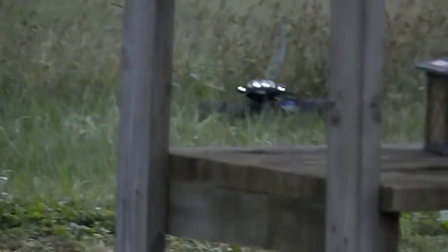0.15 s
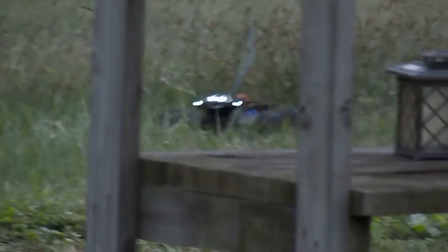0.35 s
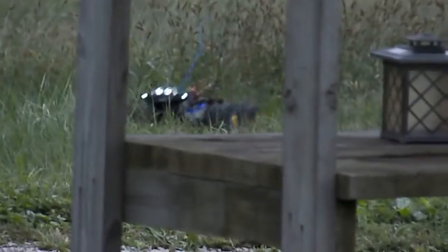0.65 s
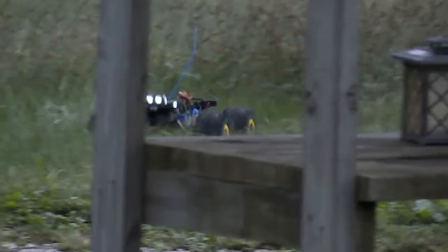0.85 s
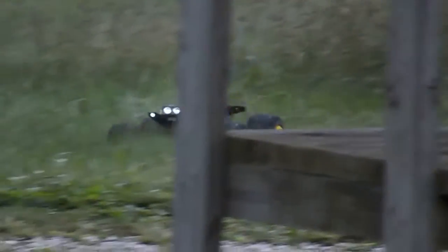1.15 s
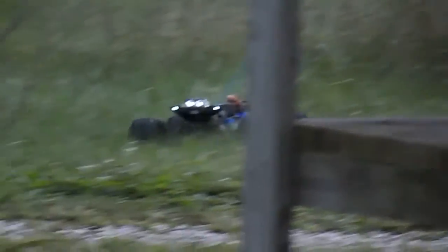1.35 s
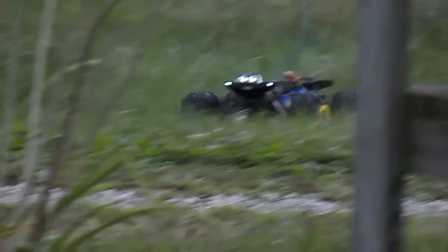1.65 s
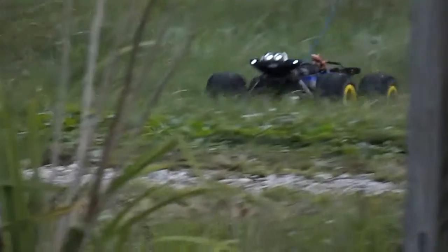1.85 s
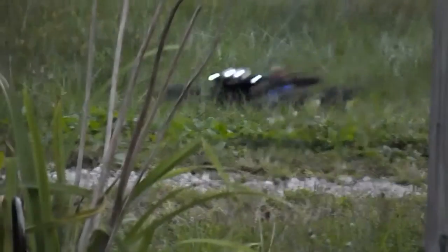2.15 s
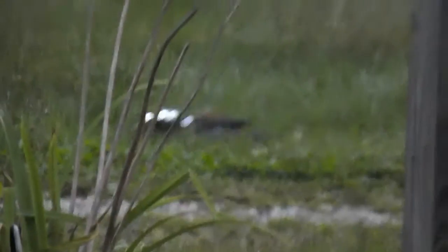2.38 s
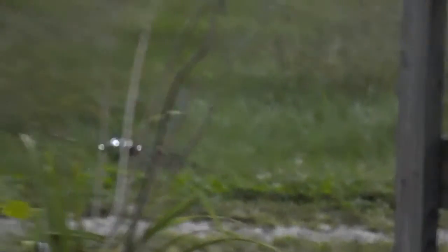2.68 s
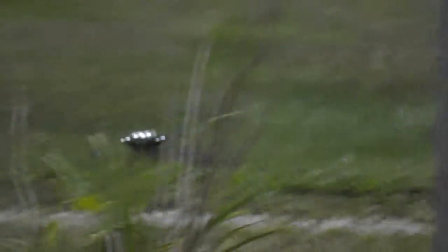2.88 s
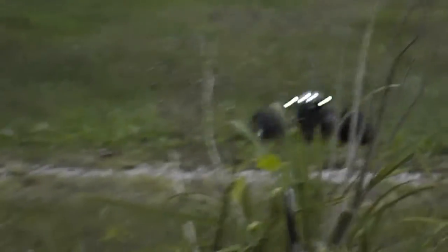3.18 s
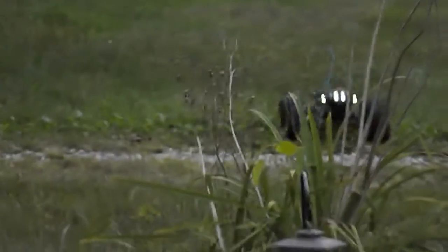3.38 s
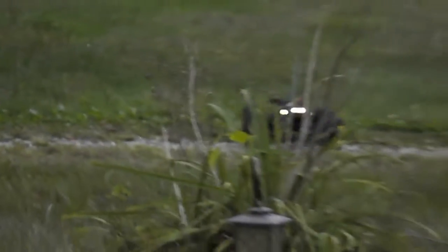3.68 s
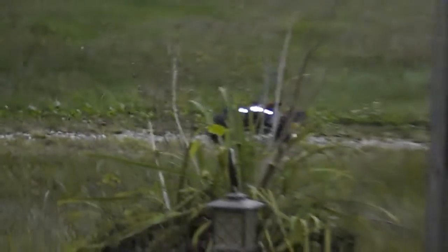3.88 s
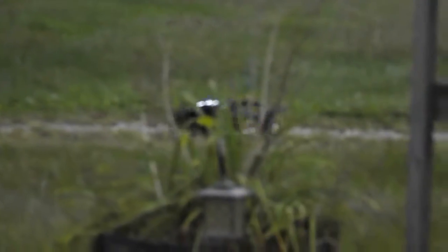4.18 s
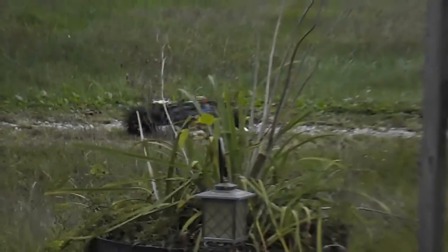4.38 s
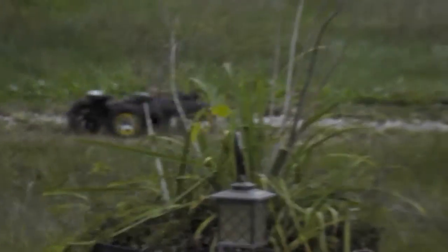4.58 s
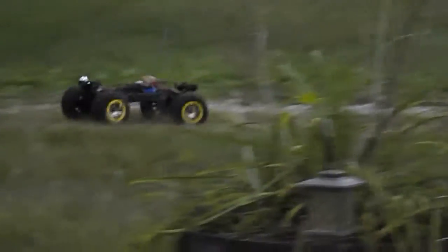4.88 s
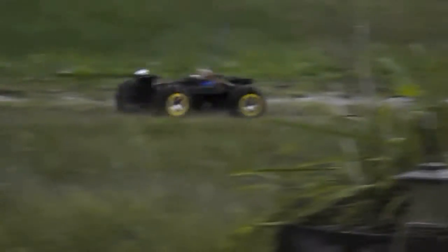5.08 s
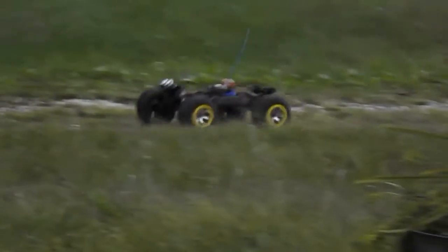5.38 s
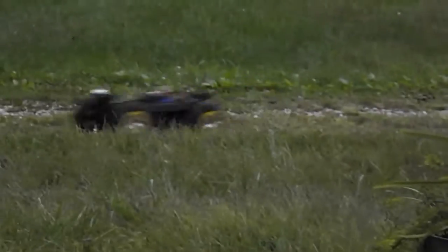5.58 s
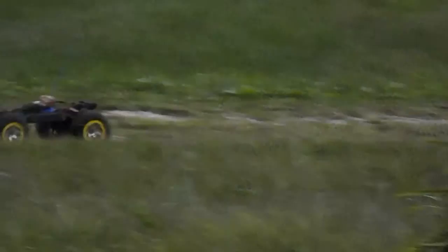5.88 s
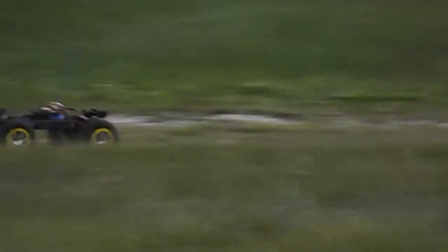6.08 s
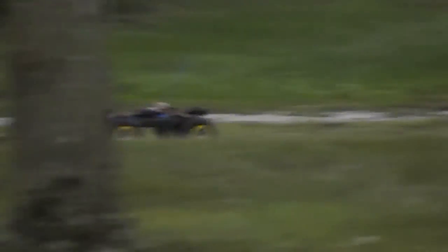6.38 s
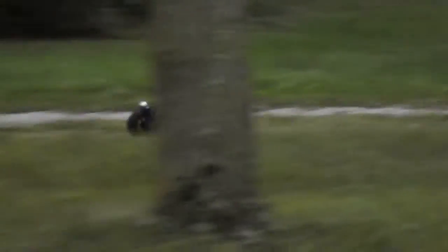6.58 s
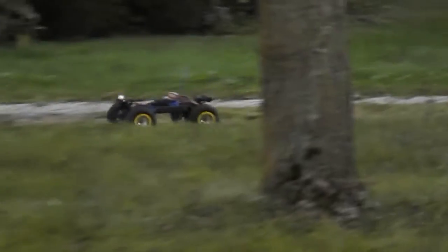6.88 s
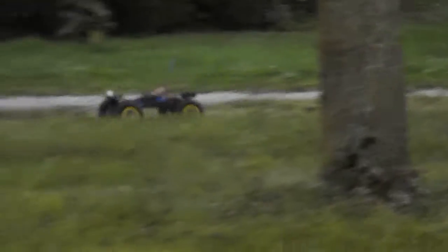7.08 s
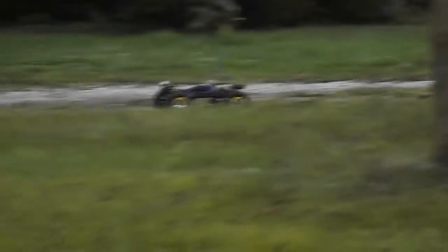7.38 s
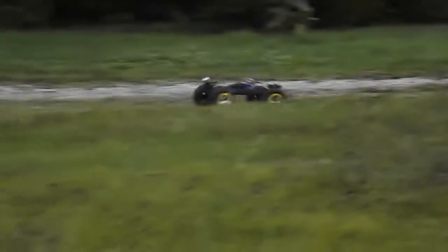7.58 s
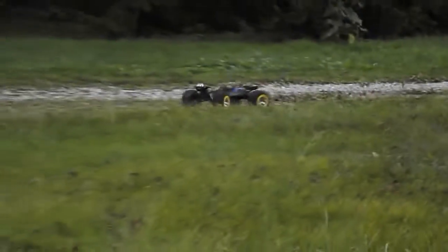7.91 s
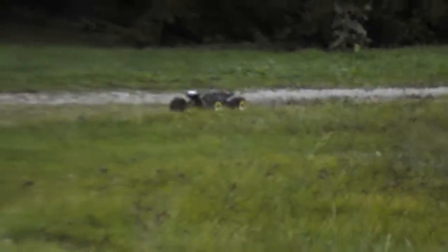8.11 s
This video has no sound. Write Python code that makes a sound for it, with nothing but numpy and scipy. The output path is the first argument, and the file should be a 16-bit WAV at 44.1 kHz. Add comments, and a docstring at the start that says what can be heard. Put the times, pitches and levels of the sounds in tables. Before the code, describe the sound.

A toy truck's rough, buzzy gear whine starts almost at once, runs about a second, drops, then returns in long and short squeezes, strongest in the second half. Rattling gears and tyre noise grow as it rolls over grass. The hand-held camera adds sharp plastic clicks, a hard snap, close knocks and left-sided motor hiss. Quiet open air, steady insect chorus and even cricket chirps fill the background.

```python
"""A grassy yard: a toy electric truck drives about, its throttle squeezed six times. Mesh tones that follow
two motor shafts make its gears whine, bog in tufts and coast down; coloured noise makes rattle and swish.
Close to the microphone a hand-held camera clicks and knocks in decaying noise bursts, and its lens drive
hisses in stepped bands of noise. Behind them: insects in narrow noise bands, the steady tones of a far
engine's hum, and four soft hoots that glide down."""
import sys
import numpy as np
from scipy import signal
from scipy.fft import rfft, irfft, next_fast_len
from scipy.io import wavfile
from scipy.ndimage import uniform_filter1d

SR = 44100
rng = np.random.default_rng(int(sys.argv[2]) if len(sys.argv) > 2 else 0)


def inscribe(sig):
    """Save sig as 16-bit PCM at rate SR to the path in sys.argv[1].

    A 1-D sig is mono; a 2-D sig holds one channel per row.
    Samples are clipped to [-1, 1] before scaling.
    """
    pcm = np.round(np.clip(np.atleast_2d(sig).T, -1, 1) * 32767)
    wavfile.write(sys.argv[1], SR, pcm.astype(np.int16))


N = 363825
TIME = np.arange(N) / SR  # s

# Squeezes of the throttle: (press [s], release [s], shaft speed after the first kick [Hz], speed aimed at [Hz],
# pick-up time constant [s], speed lost to the grass [Hz per s], high whine [relative dB], low notes [relative dB])
THROTTLE_SQUEEZES = [(0.199, 1.338, 319.6, 456, 0.29, 0, -62, -68),
                     (1.92, 3.463, 275.8, 518, 0.28, 70, -66, -63.5),
                     (4.1, 4.65, 369.6, 372, .1, 22, -57.5, -60.5),
                     (5.16, 6.92, 314.9, 510, 1.09, -1, -56.5, -60.5),
                     (7.17, 7.33, 329, 328, .1, 10, -53.5, -56),
                     (7.576, 8.3, 418.4, 471, 0.67, -2, -59, -58.5)]
# Tufts where the wheels bog down, or spin free where the loss is negative:
# (centre [s], length [s], speed lost by the front motor [Hz], by the rear motor [Hz])
GRASS_TUFTS = [(0.239, 0.084, -68, -55), (0.32, .06, -12.5, -25), (0.378, 0.17, 30, 41.5),
               (0.535, 0.092, -2.5, -2), (0.626, 0.092, 23, 22), (0.783, 0.11, -12, -11),
               (0.885, 0.14, 10, 17.5), (1.012, 0.046, -6, -6), (1.109, 0.096, 6.5, 15),
               (1.218, .07, -6, -6), (1.281, 0.064, 3, 8), (2.141, .13, 19.5, 7.5),
               (2.316, 0.075, -8, -0.5), (2.953, 0.12, 12.5, 2), (3.12, 0.063, 15, 2),
               (3.236, 0.058, 13, 0), (3.302, 0.036, -7, 5), (4.285, 0.13, -6, 54),
               (5.266, 0.083, -38.5, -19.5), (5.32, 0.081, 10, 31.5), (5.393, .08, 4, -3),
               (5.597, 0.08, 13.5, 8), (7.722, 0.064, -22, 28), (7.801, 0.093, -10.5, 59),
               (7.857, .04, 24.5, 7), (7.933, 0.05, 16, 16.5), (8.105, 0.036, 4, -12.5),
               (8.142, 0.053, 12.5, 13.5), (8.213, 0.095, -8, 2.5)]
# Main whine as the truck turns towards and away from the microphone: (time [s], level [relative dB])
WHINE_LEVEL = [(0, -66), (.42, -62), (.72, -54), (1.33, -54.5), (1.75, -57.5), (1.97, -70), (2.12, -57),
               (2.4, -56), (3.3, -55), (3.5, -51), (3.66, -64), (4.38, -59.5), (4.6, -58.5), (4.72, -52),
               (4.85, -58), (5.3, -65), (5.42, -55), (5.55, -49.5), (6.35, -49.5), (7.05, -48), (7.27, -50),
               (7.45, -48), (7.62, -52), (7.72, -52.5), (8.25, -48)]
# How the gear housing passes the main whine: (frequency [Hz], gain [dB])
MAIN_HOUSING = [(2200, -16.5), (2780, -14), (2990, -8), (3240, 0.5), (3450, 0), (3660, -7.5), (3840, 2),
                (3950, 2), (4250, -5)]
# How the gear housing passes the high whine: (frequency [Hz], gain [dB])
HIGH_WHINE_HOUSING = [(5200, -3), (6800, -2), (8000, 3.5), (8900, -6), (9450, 3), (9900, -7)]
# The truck's way over the yard: (time [s], rolling at cruising speed [relative dB], tyre rumble [relative dB])
GROUND_LEVELS = [(0, -51.5, -66.5), (1.2, -52, -67), (2.1, -51.5, -63.5), (3.3, -48, -60.5),
                 (4.08, -46, -59.5), (4.17, -48, -57), (4.5, -47.5, -60), (4.87, -46.5, -62),
                 (5.12, -51, -68), (5.36, -47, -66.5), (6.3, -44.5, -59.5), (6.65, -47, -58),
                 (7.05, -44.5, -57.5), (7.55, -45, -60), (7.9, -45, -58), (8.25, -44.5, -60.5)]
# Jolts: (centre [s], length [s], tyre thump [dB], body rasp [dB], gear grind [relative dB])
GROUND_JOLTS = [(0.23, .05, -76, -64, -58), (.37, .08, -75, -74, -59), (1.974, 0.14, -65, -50.5, -58),
                (4.25, .07, -60, -55, -50), (5.274, 0.14, -74, -45.5, -55), (7.718, 0.06, -48.5, -43, -46),
                (7.795, 0.079, -61, -42.5, -44), (7.917, .05, -55, -42.5, -57),
                (8.117, 0.047, -56, -45.5, -63)]
# Spectrum of the rattling gears: (frequency [Hz], level [relative dB])
RATTLE_SPECTRUM = [(290, -40), (500, -13), (697, -7), (904, -4.5), (1240, -7), (1440, -7.5), (1710, -4.5),
                   (2690, -4), (2960, -6), (3320, -2), (3640, -6), (3960, -2), (4350, -3), (5300, -5.5),
                   (6000, -48), (7800, -8), (13200, -120)]
# Spectrum of grass blades on the body: (frequency [Hz], level [relative dB])
SWISH_SPECTRUM = [(3060, -36), (5200, -45), (5690, -4.5), (7790, -1), (8480, -4.5), (9490, -3.5),
                  (10500, -10.5), (11900, -6.5), (14600, -12.5), (16000, -39)]
# Spectrum of the tyre rumble: (frequency [Hz], level [relative dB])
RUMBLE_SPECTRUM = [(53, -61), (90, -37), (108, -19.5), (225, -1.5), (346, 0.5), (384, -8), (497, -1),
                   (700, -7.5), (910, -32), (1540, -120)]
# Dull knocks on the camera body: (time [s], body [relative dB], crack [relative dB], left minus right [dB],
# lower ring of the struck spot [Hz], upper ring [Hz])
CAMERA_KNOCKS = [(.367, -37.5, -49, -3, 1310, 2000), (1.1195, -24, -16.5, -3.5, 1200, 1500),
                 (1.2085, -38, -41, -5, 1900, 2750), (1.242, -39, -44, -1, 1390, 2010),
                 (1.288, -30, -38, -6, 800, 1500), (1.304, -22.5, -15, -3.5, 790, 2020),
                 (1.775, -43, -54, -8, 805, 2010), (2.013, -35.5, -54, -3, 1406, 1990),
                 (2.139, -39, -40.5, -4, 1409, 2090), (3.065, -42, -56, -1, 1505, 2007),
                 (3.674, -38.5, -65, -7, 793, 1200), (4.212, -34.5, -46, 7, 1200, 1700),
                 (4.432, -41, -50, -6, 1145, 1507), (6.855, -38.5, -56, -7, 1380, 2050),
                 (7.109, -18, -14.5, -5, 1035, 2450)]
# Sharp plastic clicks: (time [s], body [relative dB], crack [relative dB], left minus right [dB])
CAMERA_CLICKS = [(1.9245, -38, -34.5, 17), (1.9365, -38, -40, 7), (1.9413, -40.5, -37, 21),
                 (1.946, -47, -47, 22), (3.3335, -25.5, -23.5, -6), (3.3545, -26.5, -19.5, -3),
                 (3.3885, -24.5, -23.5, -3), (3.402, -35, -44, -13), (3.414, -27, -23, -4),
                 (3.432, -32.5, -23, -2), (3.445, -32, -34, -10), (4.1238, -33.5, -32, 19),
                 (4.143, -37, -40, 22), (4.7645, -31, -30, -3), (5.1875, -27, -31, -7),
                 (5.2025, -25.5, -23, -5), (5.220, -28, -30, -2), (5.9928, -29.5, -29, -8),
                 (6.035, -38.5, -37, 19), (6.102, -36, -45, 20), (6.108, -46, -37, 15.5)]
# Short, hard snaps: (time [s], body [relative dB], crack [relative dB], left minus right [dB])
CAMERA_SNAPS = [(1.8657, -32, -53, 8), (3.368, -10, -15.5, 5), (3.385, -28, -40, 6),
                (4.7065, -36.5, -65, -1), (4.816, -43, -55, 4), (5.130, -34.5, -60, 7),
                (5.460, -33.5, -49, 4)]
# Spectrum of a knock: (frequency [Hz], level [relative dB])
KNOCK_SPECTRUM = [(150, -15), (250, -23), (730, 4.5), (950, -2.5), (1530, 3), (1800, -0.5), (2250, 0.5),
                  (3650, -9), (4340, -5.5), (5160, -14.5), (7310, -2.5), (8400, -9), (10200, -1.5),
                  (10700, -15), (11700, -5.5), (16000, -26)]
# Spectrum of a click: (frequency [Hz], level [relative dB])
CLICK_SPECTRUM = [(210, -53), (350, -14), (791, -7), (1280, -6.5), (2130, -4), (2420, -4), (3450, -11.5),
                  (4040, -2.5), (5570, -14), (6230, -2.5), (8440, -7.5), (9140, -9.5), (11100, -8),
                  (16000, -20.5)]
# Spectrum of a snap: (frequency [Hz], level [relative dB])
SNAP_SPECTRUM = [(350, -48), (600, -20), (1640, -8), (2200, -9.5), (3160, -6), (3730, 0.5), (5950, -15),
                 (8620, -21), (12000, -14), (16000, -40)]
# Ringing of the camera case after a click: (frequency [Hz], level [relative dB], 60 dB decay time [s])
CASE_RINGS = [(705, -19, 0.14), (900, -22.5, 0.37), (2423, -2, 0.026), (6160, -21, 0.14)]
# Runs of the lens drive: (start [s], stop [s], hiss centre [Hz], level [relative dB])
LENS_RUNS = [(1.921, 2.035, 11810, -54.5), (2.076, 4.06, 11750, -58.5), (4.115, 4.239, 11400, -58),
             (4.38, 4.65, 11360, -58.5), (6.016, 6.132, 11800, -53.5), (6.232, 8.252, 11680, -59)]
# Spectrum of the yard's open air: (frequency [Hz], level [relative dB])
AIR_SPECTRUM = [(18, -85), (30, -43), (239, -12.5), (311, -2), (364, -1.5), (616, -5), (721, -5),
                (844, -5.5), (1100, -7), (1350, -7.5), (4780, -19.5), (5450, -54), (7090, -10),
                (8300, -14.5), (16000, -16.5)]
# Tones of the far engine: (frequency [Hz], level [relative dB])
ENGINE_TONES = [(118.6, -88), (146, -85), (328.6, -76), (365, -69.5), (401.6, -69), (438, -70),
                (511, -71.5), (566, -75)]
# Soft hoots: (peak time [s], length [s], pitch at the peak [Hz], peak level [dB])
SOFT_HOOTS = [(2.329, 0.12, 324, -51), (2.553, 0.042, 321, -48), (2.699, 0.015, 325, -42.5),
              (2.813, 0.026, 308, -53)]
# Likeness of the two microphones: (frequency [Hz], side minus mid [dB])
STEREO_WIDTH = [(300, -5), (1300, -5.5), (2400, -4.5), (4400, 1), (8000, -0.5)]

KICK_S = .036  # time constant of the wheels' spin-up at a press
COAST_HZ = 190.1  # off the throttle the shafts run down towards this speed
FRONT_COAST_S, REAR_COAST_S = .33, 7  # time constants: the front motor stops quickly, the rear freewheels on
CRUISE_HZ = 452  # shaft speed at which the rolling levels hold
SURGE_DB, SURGE_S = 7, 0.26  # the rear high gear is strained at each press, then eases
SLACK_DB, SLACK_S = -18, 0.089  # the high gears fall quiet when the load comes off
BOG_DB_PER_HZ = 0.04  # rear high gear level against speed lost in the tufts
SIDEBAND_DB = -10.5  # a gear out of true puts a rough whine either side of the main one (relative level)
WHEEL_RATIO, THROB_DB = 58, 2  # shaft turns to one wheel turn; the high whine swells and sinks by this once a turn
SQUEAL_DB = -7  # high gear squeal relative to a jolt's rasp, ahead of the housing
FREEWHEEL_DB, FREEWHEEL_POWER = -70.5, 9  # rear gears free at cruising speed, ahead of the housing; power of speed
TREE_S, TREE_LENGTH_S, TREE_DB = 6.64, 0.57, -8.5  # a trunk hides the truck and shades its main whine
HIGH_SHADE_S = 6.93  # the trunk shades the high whine of both motors a moment later
RATTLE_POWER, SWISH_POWER = 0.86, 0.45  # amplitude grows as these powers of speed
SWISH_DB, SWISH_SLACK_DB = -8.5, -5  # grass setting (relative), and its drop when the wheels stop pulling
SPOT_DB, SPOT_OCTAVES = 7.5, 0.2  # height and half-width of a struck spot's ring
CHIRP_FIRST_S, CHIRP_EVERY_S, CHIRP_DB = 0.29, .702, -59.5  # the cricket (relative level)
FULL_SCALE, TOP_HZ = .95, 15800  # ceiling of the rounded peaks; top of the band


def front_drive(hz, load, main_db, high_db, low_db):
    """Front gears mesh at multiples of shaft speed: a whine, sidebands, a faint high tone, low notes, grind."""
    turns = np.cumsum(hz * (1 + 0.00401 * walk(45) + 0.00302 * walk(12))) / SR
    main_housing_db = housing(9 * hz, MAIN_HOUSING)
    high_housing_db = housing(21 * hz, HIGH_WHINE_HOUSING)
    _, _, grinding = jolting()
    shaded_db = main_db + shade(TREE_S)
    main_gain = undb(shaded_db + main_housing_db + 1.5 * walk(14))
    main = main_gain * gear(turns, order=9, smear=260, rough=0.43, flutter_db=1.5)
    grind = grinding * gear(turns, order=9, smear=330, rough=5, flutter_db=4)

    below = gear(turns, order=7.5, smear=330, rough=4.8, flutter_db=1)
    above = gear(turns, order=10.5, smear=360, rough=3, flutter_db=4)
    sideband_gain = undb(SIDEBAND_DB) * (undb(shaded_db) * load + grinding)
    sidebands = sideband_gain * (undb(-2.5) * below + above)
    high_gain = undb(high_db + high_housing_db - 16)
    high = high_gain * gear(turns, order=21, smear=400, rough=4.2, flutter_db=-1)

    # The gear housing favours each lower note near one of its resonances
    low = resonate(gear(turns, order=4, smear=230, rough=3.3, flutter_db=3.5), hz=1620, width_hz=1400)
    middle = resonate(gear(turns, order=6, smear=280, rough=2.5, flutter_db=2.5), hz=2600, width_hz=800)
    notes_gain = undb(low_db - 10 * (1 - load) + .5 * shade(TREE_S))
    notes = notes_gain * (undb(-2) * low + undb(-1) * middle)
    return main + grind + sidebands + high + notes


def rear_drive(hz, load, strain, high_db, low_db):
    """Rear gears throb with the wheel in a high whine and whirr; a main whine and drone last while freewheeling."""
    turns = np.cumsum(hz * (1 + .005 * walk(60) + .004 * walk(15))) / SR
    high_housing_db = housing(21 * hz, HIGH_WHINE_HOUSING)
    main_housing_db = housing(9 * hz, MAIN_HOUSING)
    _, rasping, grinding = jolting()
    throb_db = THROB_DB * np.sin(2 * np.pi * turns / WHEEL_RATIO)
    pull_db = high_db + SURGE_DB * strain + throb_db
    high_gain = undb(pull_db + 2 * walk(22)) + rasping * undb(SQUEAL_DB)
    high_tone = gear(turns, order=21, smear=720, rough=4.7, flutter_db=2)
    high = high_gain * undb(high_housing_db) * high_tone

    freewheel = (1 - load) * undb(FREEWHEEL_DB) * (hz / CRUISE_HZ) ** FREEWHEEL_POWER
    main_gain = undb(main_housing_db) * (undb(high_db - 5.5) + freewheel + grinding * undb(-1))
    main = main_gain * gear(turns, order=9, smear=280, rough=0.96, flutter_db=6.5)
    whirr = undb(pull_db - 12) * gear(turns, order=6, smear=430, rough=3, flutter_db=2.5)
    drone = resonate(gear(turns, order=4, smear=210, rough=3.5, flutter_db=2.5), hz=1462, width_hz=216)
    drone_gain = undb(low_db - 1 - 2.9 * (1.5 - load) + 1.3 * walk(9))
    return high + main + whirr + drone * drone_gain


def gear(turns, order, smear, rough, flutter_db):
    """A mesh tone, rms 1: teeth with play blur its phase, and bumps make it flutter at each microphone."""
    flutter = undb(flutter_db * (walk(35) + 0.14 * np.array([walk(23), walk(25)])))
    shared_blur = walk(smear) + 1j * walk(smear)
    channel_blur = np.array([walk(smear) + 1j * walk(smear) for _ in range(2)])
    blur = (shared_blur + 0.79 * channel_blur) / np.sqrt(3)
    tone = np.real((1 + rough * blur) * np.exp(2j * np.pi * order * turns))
    return unit(flutter * tone)


def motion(coast_s):
    """Shaft speed, load and strain (both 0-1): a press kicks the motors up, they pull towards a speed, then coast."""
    hz, load, strain = np.full(N, 1. * COAST_HZ), np.zeros(N), np.zeros(N)
    for press, release, kick_hz, top_hz, pickup_s, sag, *_ in THROTTLE_SQUEEZES:
        i, j = int(press * SR), min(int(release * SR), N - 1)
        on, off = TIME[:N - i], TIME[:N - j]
        kick = np.exp(-on / KICK_S)
        pickup = (kick_hz - top_hz) * np.exp(-on / pickup_s)
        hz[i:] = top_hz - sag * on + pickup + (hz[i] - kick_hz) * kick
        hz[j:] = COAST_HZ + (hz[j] - COAST_HZ) * np.exp(-off / coast_s)
        load[i:] = 1 + (load[i] - 1) * kick
        load[j:] = load[j] * np.exp(-off / SLACK_S)
        strain[i:] = np.exp(-on / SURGE_S) * (1 - kick)
    return hz, load, strain


def gear_levels():
    """High and low gear levels in dB, held from one press to the next with short smoothing."""
    table = np.array(THROTTLE_SQUEEZES)
    latest = np.maximum(np.searchsorted(table[:, 0], TIME) - 1, 0)
    return uniform_filter1d(table[latest].T[-2:], int(KICK_S * SR))


def bogging():
    """Speed in Hz that the front and the rear motor lose in the tufts."""
    return sum(np.outer(lost, np.exp(-(2 * (TIME - s) / length) ** 2))
               for s, length, *lost in GRASS_TUFTS)


def housing(hz, points):
    """Gain in dB that the gear housing gives a tone of this pitch."""
    return np.interp(hz, *np.transpose(points))


def shade(s):
    """Loss in dB while the trunk shades a whine, deepest at time s."""
    return TREE_DB * np.exp(-(2 * (TIME - s) / TREE_LENGTH_S) ** 4)


def jolting():
    """Strength of the jolts' thump, rasp and grind over time, as gains."""
    return sum(np.outer(undb(db), np.exp(-(2 * (TIME - s) / length) ** 2))
               for s, length, *db in GROUND_JOLTS)


def rolling(hz, load):
    """Gears rattle and grass flicks the body, more with speed; tyres rumble; jolts add thumps and rasps."""
    roll_db, rumble_db = curves(GROUND_LEVELS)
    speed_db = 20 * np.log10(hz / CRUISE_HZ)
    rattle_db = roll_db + RATTLE_POWER * speed_db
    swish_db = roll_db + SWISH_DB + SWISH_POWER * speed_db
    swish_db = swish_db + SWISH_SLACK_DB * (1 - load) + 0.22 * (roll_db - roll_db.mean())

    grains = undb(1.66 * walk(900))  # shared by rattle and swish
    rattle = colour(noise() * grains, RATTLE_SPECTRUM) * undb(rattle_db - 1.37 + 1.55 * walk(30))
    swish = colour(noise() * grains, SWISH_SPECTRUM) * undb(swish_db + 4.5 + 0.17 * walk(32))
    rumble = colour(noise(), RUMBLE_SPECTRUM) * undb(rumble_db + 2.5 + 1.95 * walk(14))
    thump = resonate(noise(), hz=259, width_hz=130)
    rasp = resonate(noise() * undb(1.8 * walk(600)), hz=3320, width_hz=9100)
    thumping, rasping, _ = jolting()
    return rattle + swish + rumble + thumping * thump + rasping * rasp


def handling():
    """Knocks, clicks and snaps on the camera; the clicks ring its case, which is too small to give bass."""
    knocks = blows(CAMERA_KNOCKS, KNOCK_SPECTRUM, split_hz=1970, body_t60=0.054, crack_t60=0.025,
                   rise=0.00053, snap=0.39)
    clicks = blows(CAMERA_CLICKS, CLICK_SPECTRUM, split_hz=4400, body_t60=0.074, crack_t60=0.066,
                   rise=0.00019, snap=6.3)
    snaps = blows(CAMERA_SNAPS, SNAP_SPECTRUM, split_hz=6800, body_t60=0.02, crack_t60=0.011,
                  rise=0.00035, snap=0.51)
    t, pushes = TIME[:SR // 2], np.zeros(N)
    for s, body_db, _, _ in CAMERA_CLICKS:
        pushes[int(s * SR)] += undb(body_db)
    ring = sum(undb(db - 60 * t / t60) * np.sin(2 * np.pi * hz * t) for hz, db, t60 in CASE_RINGS)
    case = signal.fftconvolve(pushes, ring)[:N] * pan(-5.5)
    sound = undb(-1.5) * knocks + undb(-4) * clicks + undb(-3.5) * snaps + case
    return signal.sosfilt(signal.butter(2, 250, "high", fs=SR, output="sos"), sound)


def blows(table, spectrum, split_hz, body_t60, crack_t60, rise, snap):
    """Each blow is a bright crack, snapping at first contact, over a body; the struck spot may add rings."""
    out, t = np.zeros((2, N)), TIME[:SR // 8]
    onset = 1 - np.exp(-t / rise)
    for s, body_db, crack_db, pan_db, *rings in table:
        burst = colour(rng.standard_normal((2, len(t))), spectrum)
        for hz in rings:
            burst = shape(burst, lambda f: undb(SPOT_DB * np.exp(-(np.log2(f / hz) / SPOT_OCTAVES) ** 2)))
        body = shape(burst, lambda f: 1 / (1 + (f / split_hz) ** 4))
        body = body * onset * undb(-60 * t / body_t60)
        crack = shape(burst, lambda f: 1 / (1 + (split_hz / f) ** 4))
        crack = crack * onset * undb(-60 * t / crack_t60)
        crack = crack * (1 + snap * np.exp(-t / 0.002))
        blow = undb(body_db) * unit(body) + undb(crack_db) * unit(crack)
        blow = undb(-16.5) * blow * pan(pan_db)
        i = int(s * SR)
        out[:, i:i + len(t)] += blow[:, :N - i]
    return out


def lens():
    """The lens drive starts and stops abruptly: quick steps hiss in a narrow band and a broad lower one."""
    top, lower, source = np.zeros((2, N)), np.zeros(N), noise()
    for start, stop, hz, db in LENS_RUNS:
        run = slice(int(start * SR), int(stop * SR))
        top[:, run] += undb(db) * resonate(source[:, run], hz=hz, width_hz=680)
        lower[run] += undb(db)
    pulse = np.sin(2 * np.pi * 60 * TIME + walk(14))
    steps = undb(2.46 * walk(380) + 1.36 * walk(22) + 0.84 * pulse)
    body = lower * resonate(noise(), hz=6200, width_hz=6100)
    return steps * (top * pan(13.3) + undb(3) * body * pan(11.4))


def insects():
    """A steady chorus, and one cricket chirping evenly, its wings stroking 65 times a second."""
    chorus = resonate(noise(), hz=6260, width_hz=1060) * undb(-56.5)
    chirp_times = np.arange(CHIRP_FIRST_S, N / SR, CHIRP_EVERY_S)
    chirps = undb(CHIRP_DB) * sum(np.exp(-((TIME - s) / 0.12) ** 4) for s in chirp_times)
    strokes = 1 + np.sin(2 * np.pi * 65 * TIME)
    return chorus + chirps * strokes * resonate(noise(), hz=7120, width_hz=130)


def yard():
    """Broad outdoor air, a far engine's tones that fade as the microphone turns away, and falling hoots."""
    air = colour(noise(), AIR_SPECTRUM) * undb(-54.5 + .5 * walk(3.2))
    hum = 0
    for hz, db in ENGINE_TONES:
        level = undb(db + 1.6 * walk(3.27)) * np.sqrt(2)
        hum = hum + level * np.sin(2 * np.pi * hz * TIME + .5 * walk(4.96))
    hum = hum * undb(np.interp(TIME, [2.8, 5], [1.5, -6]))
    hoots = 0
    for s, length, hz, db in SOFT_HOOTS:
        t = TIME - s
        swell = undb(db) * np.exp(-(2 * t / length) ** 2)
        hoots = hoots + swell * np.sin(2 * np.pi * hz * (t - 0.99 * t ** 2))
    return air + hum + hoots


def undb(db):
    """Decibels to gain."""
    return 10 ** (np.asarray(db) / 20)


def unit(x):
    """Scale to rms 1."""
    return x / np.sqrt(np.mean(x ** 2, axis=-1, keepdims=True))


def curves(table):
    """The columns of a table joined by straight lines in time."""
    s, *columns = np.transpose(table)
    return [np.interp(TIME, s, c) for c in columns]


def walk(rate):
    """A smooth random wander of rms 1, from this many random values a second."""
    k = max(int(SR / rate), 2)
    held = np.repeat(rng.standard_normal(N // k + 2), k)
    smooth = uniform_filter1d(uniform_filter1d(held, k), k)
    return unit(smooth[:N])


def pan(db):
    """Left and right gains for a level difference."""
    return undb(np.array([[db], [-db]]) / 2)


def noise():
    """Two-channel white noise, more alike in the bass than in the treble."""
    n = next_fast_len(N)
    mid, side = rfft(rng.standard_normal((2, n)))
    hz, db = np.transpose(STEREO_WIDTH)
    share = undb(np.interp(np.linspace(0, SR / 2, len(mid)), hz, db))
    pair = mid + share * side * np.array([[1], [-1]])
    return unit(irfft(pair / np.sqrt(1 + share ** 2), n)[:, :N])


def shape(x, gain):
    """Filter by a gain given as a function of frequency; rms 1."""
    n = next_fast_len(x.shape[-1])
    hz = np.maximum(np.arange(n // 2 + 1) * SR / n, 1)
    return unit(irfft(rfft(x, n) * gain(hz), n)[..., :x.shape[-1]])


def colour(x, points):
    """Filter by (frequency [Hz], level [dB]) points, joined on a log-frequency scale."""
    hz, db = np.transpose(points)
    return shape(x, lambda f: undb(np.interp(np.log(f), np.log(hz), db)))


def resonate(x, hz, width_hz):
    """A resonance applied twice, for steep skirts."""
    return shape(x, lambda f: 1 / (1 + 1j * (f ** 2 - hz ** 2) / (f * width_hz)) ** 2)


def scene():
    """Truck, camera and yard together at the microphones."""
    front_hz, load, strain = motion(FRONT_COAST_S)
    rear_hz, _, _ = motion(REAR_COAST_S)
    front_lost, rear_lost = bogging()
    high_db, low_db = gear_levels()
    main_db, = curves(WHINE_LEVEL)
    high_db = high_db + SLACK_DB * (1 - load) + 0.71 * shade(HIGH_SHADE_S)
    front = front_drive(front_hz - front_lost, load, main_db, high_db, low_db)
    rear_high_db = high_db + BOG_DB_PER_HZ * rear_lost
    rear = rear_drive(rear_hz - rear_lost, load, strain, rear_high_db, low_db)
    truck = front + rear + rolling(front_hz, load)
    camera = lens() + handling()
    return truck + camera + insects() + yard()


def record(dry):
    """Round the loudest peaks softly and cut the top of the band steeply."""
    rounded = FULL_SCALE * np.tanh(dry / FULL_SCALE)
    return signal.sosfilt(signal.ellip(10, .1, 80, TOP_HZ, fs=SR, output="sos"), rounded)


dry = scene()
out = record(dry)
inscribe(out)
```